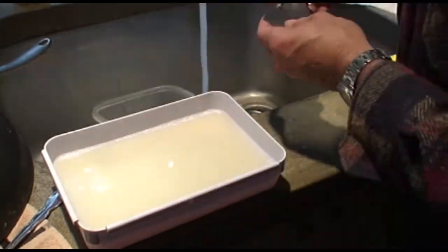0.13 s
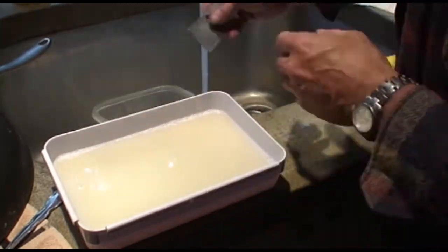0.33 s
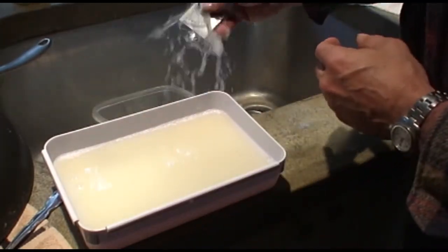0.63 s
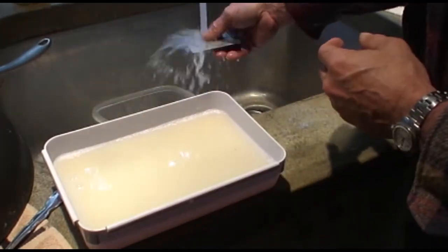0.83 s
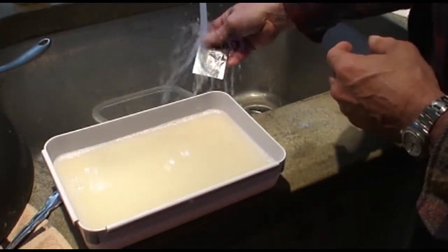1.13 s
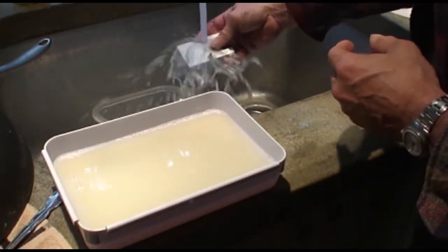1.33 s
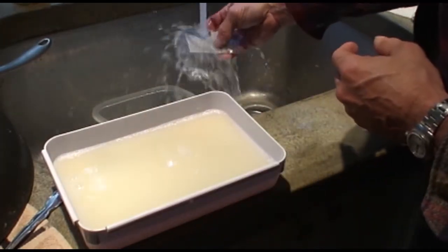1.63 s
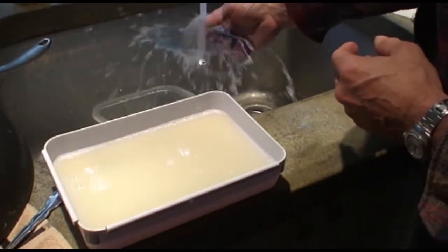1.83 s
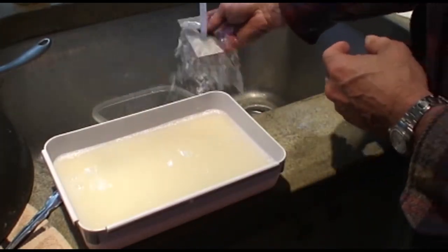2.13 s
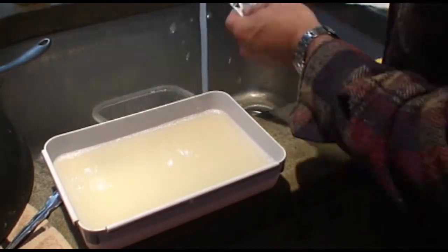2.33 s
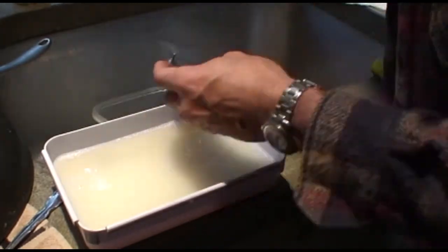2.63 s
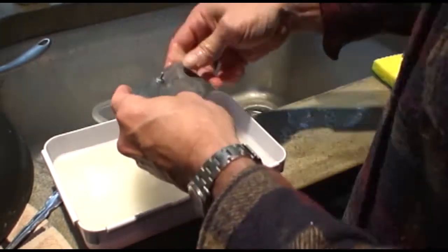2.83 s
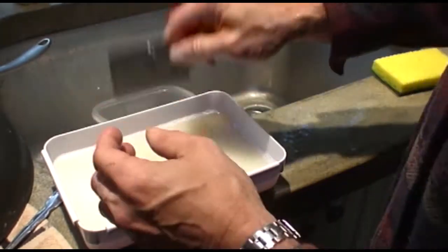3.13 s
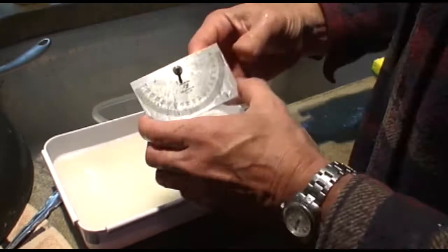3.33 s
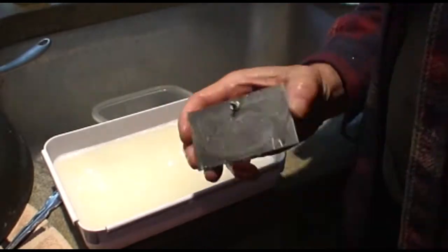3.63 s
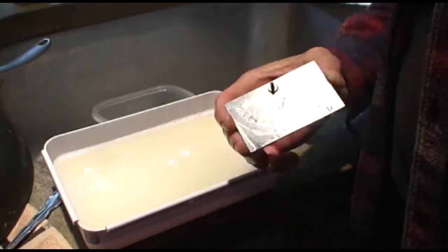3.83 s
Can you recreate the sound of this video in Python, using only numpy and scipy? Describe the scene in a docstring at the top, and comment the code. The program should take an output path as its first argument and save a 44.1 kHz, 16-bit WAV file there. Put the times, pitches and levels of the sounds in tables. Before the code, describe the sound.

Running tap water blasts loudly into a steel sink, then shuts off abruptly to a faint trickle

```python
"""A flick of spout hiss, then an aerated tap jet hits a steel kitchen sink, close to a mono microphone.
A thin metal plate is rinsed: filtered froth becomes spray, and drops ring the damped modes of the basin.
The jet falls freely again, then the tap is shut with last spurts of froth and a rough, gliding squeak.
Noise and bubble clouds trickle away; damped tones and droplet bursts are hands on the wet plate.
Shaped noise gives the room's hum and hiss; the microphone clips on the peaks."""
import sys
import numpy as np
from scipy import signal
from scipy.fft import rfft, irfft, next_fast_len
from scipy.io import wavfile
from scipy.ndimage import uniform_filter1d, map_coordinates

SR = 44100
rng = np.random.default_rng(int(sys.argv[2]) if len(sys.argv) > 2 else 0)


def file_out(sig):
    """Save sig as 16-bit WAV at sys.argv[1]."""
    # one column per channel
    cols = np.atleast_2d(sig).T
    # limit, then scale
    lim = np.clip(cols, -1, 1)
    pcm = np.round(lim * 32767).astype(np.int16)
    wavfile.write(sys.argv[1], SR, pcm)


N = 176400

# times of the story [s]
LAND_S, RINSE_FROM_S, RINSE_TO_S, SHUT_S = 0.05, 0.43, 2.235, 2.638
SWITCH_S = 0.015  # time to enter or leave the jet
SHUT_DB_PER_S = 752  # fall of the flow once the valve closes


def amp(db):
    """Decibels to gain."""
    return 10 ** (np.asarray(db) / 20)


def unit(x):
    """Scale to rms 1."""
    return x / np.sqrt(np.mean(x ** 2) + 1e-20)


def clock():
    """Seconds at each sample."""
    return np.arange(N) / SR


def curve(rows):
    """One value per sample, in straight lines between (time, value) points."""
    times, values = np.transpose(rows)
    return np.interp(clock(), times, values)


def after(s):
    """A quick ramp from 0 to 1 around time s."""
    return np.clip(0.5 + (clock() - s) / SWITCH_S, 0, 1)


def wobble(rate):
    """A smooth random curve, rate knots a second."""
    return map_coordinates(rng.standard_normal(4096), [clock() * rate], mode="mirror")


def decay(s, t60, attack_s):
    """Time since s, and an envelope that rises and dies away from there."""
    t = np.maximum(clock() - s, 0)
    return t, amp(-60 * t / t60) * (1 - np.exp(-t / attack_s))


def filtered(x, response):
    """x times a response of frequency."""
    size = next_fast_len(N + SR // 2)
    spectrum = rfft(x, size) * response(np.fft.rfftfreq(size, 1 / SR))
    return irfft(spectrum, size)[..., :N]


def coloured(x, points):
    """x shaped by (Hz, dB) points on a log axis, rms 1."""
    f, db = np.transpose(points)
    return unit(filtered(x, lambda hz: amp(np.interp(np.log(hz + 1), np.log(f), db))))


def impacts(rate, spread_db):
    """Drops land at random, rate a second, as clicks of scattered size and either sign."""
    hits = rng.random(N) < rate / SR
    size = amp(spread_db * np.clip(rng.standard_normal(N), -2.5, 2.5))
    return hits * rng.choice([-1, 1], N) * size


def bubbles(low_hz, high_hz, cycles, spread_db, count, size=300):
    """A cloud of tiny bubbles, each a damped sine that lasts some cycles."""
    when, pitch, strength = rng.random((3, count, 1))
    hz = low_hz * (high_hz / low_hz) ** pitch
    k = np.arange(size)
    turns = hz * k / SR
    # most bubbles are weak, a few are strong
    gain = amp(spread_db * np.minimum(-np.log(1 - strength), 5)) * hz / high_hz
    fade = np.exp(-turns / cycles) * (1 - k / size)
    ring = gain * fade * np.sin(2 * np.pi * turns)
    places = (when * N).astype(int) + k
    return unit(np.bincount(places.ravel(), ring.ravel(), N + size)[:N])


def froth(drop_rate, drop_db, bubble_db, spread_db):
    """Water breaking up: smooth rush, drop clicks and bursting bubbles."""
    rush = rng.standard_normal(N)
    drops = amp(drop_db) * unit(impacts(drop_rate, spread_db))
    bursting = amp(bubble_db) * bubbles(1781, 15900, cycles=14, spread_db=3, count=7000)
    return rush + drops + bursting


def bursts(rows, colour, t60, attack_s):
    """Short gushes of froth that swell and die away."""
    life = sum(amp(db) * decay(s, t60, attack_s)[1] for s, db in rows)
    return life * coloured(froth(3000, drop_db=-7, bubble_db=-5.5, spread_db=8), colour)


def splat(s, centre_hz, t60, sharpness):
    """A quick burst of droplets around one pitch."""
    droplets = rng.standard_normal(N) + unit(impacts(2500, spread_db=5.5))
    band = filtered(droplets, lambda hz: 1 / (1 + (sharpness * np.log((hz + 1) / centre_hz)) ** 2))
    return decay(s, t60, attack_s=0.0035)[1] * unit(band)


def bubble_notes(rows):
    """Single bubbles ring with a rising, unsteady pitch."""
    rise = 1.2  # share of pitch gained per second
    out = np.zeros(N)
    for s, db, hz, t60 in rows:
        t, life = decay(s, t60, attack_s=0.00088)
        phase = 2 * np.pi * hz * t * (1 + rise * t / 2) + 1.05 * wobble(hz / 12)
        out += amp(db) * life * np.sin(phase)
    return out


# hum and hiss of the room: (frequency [Hz], relative level [dB])
ROOM_COLOUR = [(25, -39), (85, -30), (112, -15), (190, -8.5), (290, -4), (390, -7.5), (470, -11.5),
               (800, -14), (1200, -21), (2000, -24), (4000, -24), (10000, -22.5), (12000, -22),
               (13200, -26), (15500, -27.5)]


def room():
    """Steady noise, strongest in the low hum, under everything."""
    return amp(-44.5) * coloured(rng.standard_normal(N), ROOM_COLOUR)


# thin stream after the tap is shut: (time [s], level [dB])
TRICKLE_LEVEL = [(2.6, -48), (2.72, -47), (2.8, -54), (3.0, -50), (3.12, -47.5), (3.27, -53), (3.37, -50.5),
                 (3.55, -57.5), (4.0, -56)]
# tone of the thin stream: (frequency [Hz], relative level [dB])
TRICKLE_COLOUR = [(500, -3), (1000, 4), (1800, 4.5), (2400, -1), (3500, -5), (8000, -6.5), (11500, -4),
                  (15500, -8)]


def trickle():
    """Water trickles away as small bubbles over a soft rush."""
    cloud = bubbles(800, 14600, cycles=16, spread_db=2.0, count=1800, size=400)
    water = coloured(cloud + rng.standard_normal(N), TRICKLE_COLOUR)
    return amp(curve(TRICKLE_LEVEL)) * after(SHUT_S) * water


# drips that trap a bubble: (time [s], level [dB], starting pitch [Hz], t60 [s])
DRIPS = [(2.738, -40, 3590, 0.049), (2.861, -39, 2870, .04), (2.925, -42, 3550, 0.1),
         (3.016, -36, 5700, .045), (3.07, -36, 11300, .04), (3.121, -33.5, 11400, .04),
         (3.365, -41, 1610, .08), (3.447, -38, 8100, .04), (3.501, -39, 7400, .05)]


def drips():
    """Each drip traps a bubble, which rings as a damped, rising sine."""
    return bubble_notes(DRIPS)


# falling water and fingers on the plate: (time [s], level [dB], centre [Hz], t60 [s])
SPLATS = [(2.888, -32, 12000, 0.05), (2.89, -41, 990, 0.13), (2.77, -40, 14000, .06),
          (2.815, -40, 10500, 0.067), (3.013, -35.5, 2560, 0.12), (3.014, -38.5, 5500, 0.1),
          (3.024, -38, 1600, .14), (3.174, -41, 1920, 0.14), (3.25, -45, 12300, .06),
          (3.33, -43, 9500, .14), (3.36, -41.5, 12500, .16), (3.935, -31, 12800, .05)]


def wet_splats():
    """Wet ticks and splats: quick bursts of droplets in a band of their own."""
    return sum(amp(db) * splat(s, hz, t60, sharpness=3.5) for s, db, hz, t60 in SPLATS)


# tap and tray: (time [s], peak level [dB], pitch [Hz], time from peak to 1/e [s])
KNOCKS = [(2.599, -27.5, 270, 0.0065), (3.37, -41, 205, .012), (3.433, -34.5, 220, 0.0037),
          (3.936, -29, 803, 0.006), (3.952, -34, 417, 0.0029)]


def knocks():
    """Soft, dull knocks: a low sine under a bell-shaped swell."""
    out = np.zeros(N)
    for s, db, hz, half_s in KNOCKS:
        t = clock() - s
        swell = np.exp(-(t / half_s) ** 2)
        out += amp(db) * swell * np.sin(2 * np.pi * hz * t + 0.26 * wobble(hz / 2))
    return out


# the thin plate touches the tray: (time [s], level [dB])
PLATE_TOUCHES = [(3.918, -41), (3.929, -43), (3.939, -46), (3.948, -46)]
# ringing modes of the plate: (frequency [Hz], relative level [dB], t60 [s])
PLATE_MODES = [(5100, -6, .05), (6200, -1.5, .05), (8100, -1.5, 0.056), (11900, -4, .04)]


def plate():
    """Each touch rings the plate, damped and roughened by wet fingers."""
    out = np.zeros(N)
    for hz, mode_db, t60 in PLATE_MODES:
        life = sum(amp(db) * decay(s, t60, attack_s=0.001)[1] for s, db in PLATE_TOUCHES)
        out += amp(mode_db) * life * np.sin(2 * np.pi * hz * clock() + 1.4 * wobble(700))
    return out


# air squeezing through water, wet fingers slipping:
# (time [s], length [s], level [dB], start pitch [Hz], end pitch [Hz], roughness [rad])
SQUEAKS = [(2.652, 0.022, -35.5, 1930, 1820, .8), (2.672, .075, -43, 2050, 1594, 1.7),
           (2.735, .04, -44, 10400, 11150, .45), (3.07, 0.074, -49, 2080, 2330, 1),
           (3.139, .016, -46, 4300, 4450, 1.2)]


def squeaks():
    """Short whistles that swell, glide and fade; the rough ones break up."""
    out = np.zeros(N)
    for s, length, db, start_hz, end_hz, rough in SQUEAKS:
        u = np.clip((clock() - s) / length, 0, 1)
        turns = np.cumsum(start_hz + (end_hz - start_hz) * u) / SR
        level = amp(db + 2.5 * rough * wobble(130)) * np.sin(np.pi * u)
        out += level * np.sin(2 * np.pi * turns + rough * wobble(400))
    return out


# the spout empties: (time [s], level [dB])
SPURTS = [(2.64, -19), (2.663, -10), (2.689, -26.5)]
# tone of the spurts: (frequency [Hz], relative level [dB])
SPURT_COLOUR = [(600, -34), (2000, -22), (4000, -16), (7500, -4), (10000, 5), (12500, 6.5), (15500, -11)]


def spurts():
    """The last water leaves the spout in short, bright gushes of froth."""
    return bursts(SPURTS, SPURT_COLOUR, t60=0.065, attack_s=0.0032)


# single bubbles in the running water, low gurgles to high chirps:
# (time [s], level [dB], starting pitch [Hz], t60 [s])
PLOPS = [(.645, -29.5, 377.3, 0.12), (.805, -34.5, 138, 0.16), (1.483, -31.5, 420, 0.069),
         (1.664, -15, 3180, 0.066), (1.776, -3.5, 7400, 0.054), (2.235, -33, 289, 0.17),
         (2.472, -31, 580, 0.068), (2.478, -10, 3960, 0.043)]


def plops():
    """Single bubbles, low and high, ring as damped, rising sines."""
    return bubble_notes(PLOPS)


# slugs of water on the steel: (time [s], level [dB])
SLAPS = [(.055, -34), (.292, -33), (.335, -35), (.61, -34), (.795, -30), (.845, -35), (1.605, -39),
         (1.99, -34), (2.022, -27.5), (2.05, -31), (2.37, -36)]
# tone of the slaps: (frequency [Hz], relative level [dB])
SLAP_COLOUR = [(30, -14), (150, -8), (400, 4), (900, -3), (2000, 3), (3500, -11), (8000, -20)]


def slaps():
    """Slugs of water slap the steel as fuller, darker bursts of froth."""
    return bursts(SLAPS, SLAP_COLOUR, t60=0.16, attack_s=0.0047)


# gobs of spray on the steel: (time [s], level [dB], centre [Hz])
SPATTERS = [(.429, -15, 5600), (.617, -19, 7000), (.657, -19, 5170), (.843, -12, 7900), (1.191, -11, 5800),
            (1.774, -12, 7540), (1.914, -18, 3600), (2.238, -14, 4400)]


def spatters():
    """Single gobs thrown off the plate stand out of the spray."""
    return sum(amp(db) * splat(s, hz, t60=0.095, sharpness=4.9) for s, db, hz in SPATTERS)


# ringing modes of the basin: (frequency [Hz], relative level [dB], t60 [s])
BASIN_MODES = [(135.2, -0.5, 0.26), (167.2, -5.5, 0.36), (192, 1.5, 0.13), (226, -12, 0.18),
               (272, -7, 0.15), (322, 0.5, 0.077), (369, -1.5, 0.088), (421, 4.5, 0.069), (710, -7, 0.1)]


def basin(strength):
    """Falling drops drum on the steel and ring its modes."""
    t = np.arange(SR // 2) / SR
    ring = np.zeros(len(t))
    for hz, db, t60 in BASIN_MODES:
        ring += amp(db - 60 * t / t60) * np.sin(2 * np.pi * hz * t) * rng.choice([-1, 1])
    blows = unit(impacts(130, spread_db=1.5)) * strength
    return amp(-48) * signal.fftconvolve(blows, ring / np.linalg.norm(ring))[:N]


# low rumble of the jet: (frequency [Hz], relative level [dB])
THRUM_COLOUR = [(25, -10), (60, -16), (170, 4), (450, -7), (900, -19), (2000, -22), (5000, -28)]


def thrum():
    """Low rumble of the unbroken jet: noise and low-pitched bubbles."""
    gurgle = rng.standard_normal(N) + bubbles(440, 1940, cycles=6.5, spread_db=2.5, count=1500, size=900)
    return coloured(gurgle, THRUM_COLOUR) * amp(-49 + 1.1 * wobble(25.6))


# tone of the coarse splatter: (frequency [Hz], relative level [dB])
SPLATTER_COLOUR = [(40, -32), (300, -21), (600, -10), (1100, -17), (1800, -6.5), (2900, -1), (4500, 1.5),
                   (8000, -6), (15000, -25)]


def splatter(level_db):
    """Coarse, clicking froth whose level is uneven because the stream is broken."""
    water = coloured(froth(900, drop_db=-0.5, bubble_db=5.5, spread_db=4.5), SPLATTER_COLOUR)
    return water * amp(level_db - 3.5 + 1.5 * wobble(45.5))


def patchy(x, depth_db):
    """Each part of the treble flutters on its own as the sheet of water tears."""
    z = signal.stft(x, nperseg=256)[2]
    field = uniform_filter1d(rng.standard_normal(z.shape), size=9, axis=0)  # across pitch
    field = uniform_filter1d(field, size=5, axis=1)  # across time
    return signal.istft(z * amp(depth_db * unit(field)), nperseg=256)[1][:N]


# tone of the spray off the plate: (frequency [Hz], relative level [dB])
SPRAY_COLOUR = [(600, -28.5), (2200, -21), (3500, -12), (5000, -5.5), (7500, -1.9), (10000, 0.2),
                (12000, 2.1), (14200, -1.6), (15500, -4.5)]


def spray():
    """The jet fans out on the plate: froth with a torn, fluttering treble."""
    sheet = patchy(froth(1800, drop_db=-9.5, bubble_db=-11.0, spread_db=2.0), depth_db=1.27)
    return coloured(sheet, SPRAY_COLOUR) * amp(0.9 + 0.7 * wobble(54.94))


# tone of the spout: (frequency [Hz], relative level [dB])
SPOUT_COLOUR = [(300, -28), (1500, -16.5), (3500, -12.5), (6000, -5), (9500, -0.5), (11500, 3),
                (15500, -0.5)]


def spout():
    """Bright noise of water leaving the tap before it lands."""
    return coloured(rng.standard_normal(N), SPOUT_COLOUR) * amp(-13.5)


# tone of the jet on steel: (frequency [Hz], relative level [dB])
JET_COLOUR = [(600, -31.5), (2500, -23), (3350, -17), (3850, -6.5), (4250, -12.5), (4700, -8.5), (6500, -5),
              (8500, -2.5), (9200, 0.5), (10000, .5), (11700, 0.5), (13300, -1.5), (15500, -6)]


def jet():
    """The aerated jet hits the bottom of the sink as dense, bright froth."""
    return coloured(froth(3000, drop_db=-8.0, bubble_db=-10.5, spread_db=2.5), JET_COLOUR) * amp(0.7)


# treble hiss on steel or plate, before the trims in jet and spray: (time [s], level [dB])
HISS_LEVEL = [(.05, -5), (.1, -6), (.22, -7.5), (.33, -7.5), (.405, -8), (.42, -13), (.44, -8),
              (.465, -14.5), (.505, -7.5), (.58, -12), (.63, -7.5), (.66, -9), (.73, -9.5), (.76, -5.5),
              (.782, -10.5), (.812, -5), (.83, -15.5), (.85, -9.5), (.9, -12), (1.15, -11), (1.4, -10),
              (1.46, -11), (1.49, -8), (1.55, -9), (1.62, -9.5), (1.76, -11.5), (1.78, -9), (1.9, -13.5),
              (1.92, -9.5), (1.97, -7.5), (2.01, -12), (2.11, -10), (2.17, -9), (2.228, -14.5), (2.245, -7),
              (2.5, -7.5), (2.64, -9.5)]
# coarser splatter, before the trim in splatter: (time [s], level [dB])
SPLATTER_LEVEL = [(.05, -14.5), (.065, -10), (.1, -26), (.22, -23.5), (.33, -21.5), (.47, -26.5),
                  (.55, -22), (.66, -19), (.82, -23.5), (.9, -30), (1.1, -30.5), (1.38, -22.5), (1.5, -24),
                  (1.62, -25), (1.72, -25.5), (1.78, -25), (1.89, -25), (1.95, -24.5), (2.05, -24),
                  (2.2, -22), (2.26, -20.5), (2.38, -25.5), (2.55, -24), (2.64, -30.5)]


def running_water():
    """Spout hiss, then jet on steel or spray off the plate, over splatter, rumble and drumming."""
    splatter_db = curve(SPLATTER_LEVEL)
    flow = amp(-SHUT_DB_PER_S * np.maximum(clock() - SHUT_S, 0))
    landed = after(LAND_S)
    rinse = np.clip(after(RINSE_FROM_S) - after(RINSE_TO_S), 0, 1)
    hiss = amp(curve(HISS_LEVEL)) * (jet() * np.sqrt(1 - rinse) + spray() * np.sqrt(rinse))
    rush = flow * (spout() * (1 - landed) + landed * (hiss + thrum() * (1 - rinse)))
    coarse = landed * np.sqrt(flow) * splatter(splatter_db)  # splatter outlasts the jet
    # the unbroken jet drums less than the falling drops; heavier splatter drums harder
    drum_db = -5 * (0.5 - rinse) + 0.5 * (splatter_db - np.median(splatter_db))
    return rush + coarse + basin(landed * flow * amp(drum_db))


def scene():
    """One microphone feeds both channels."""
    handling = wet_splats() + knocks() + plate() + squeaks()
    draining = trickle() + drips() + spurts()
    water = plops() + slaps() + spatters() + running_water()
    mono = room() + draining + handling + water
    return np.array([mono, mono])


def record(dry):
    """Peaks are rounded off near full scale; nothing is kept above the band limit."""
    top_hz = 15780
    clipped = dry / (1 + np.abs(dry / 1.05) ** 8) ** (1 / 8)
    return filtered(clipped, lambda hz: hz < top_hz)


dry = scene()
out = record(dry)
file_out(out)
```